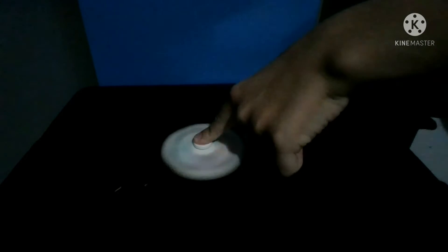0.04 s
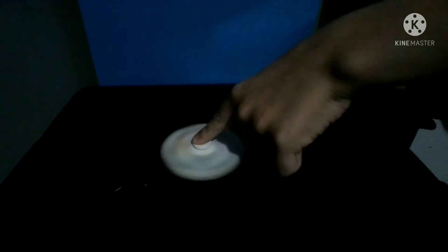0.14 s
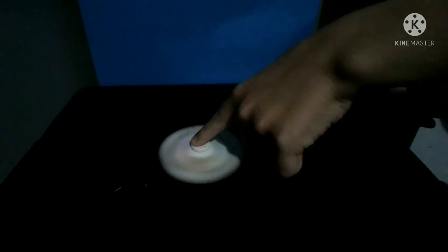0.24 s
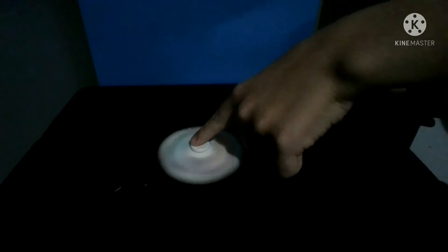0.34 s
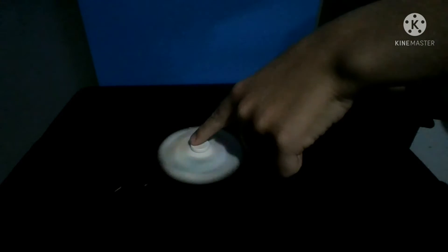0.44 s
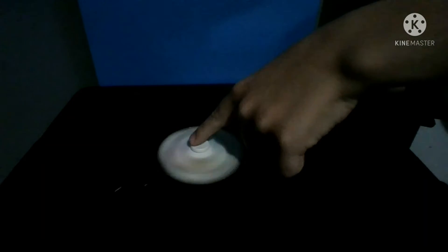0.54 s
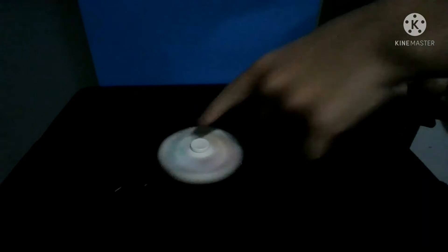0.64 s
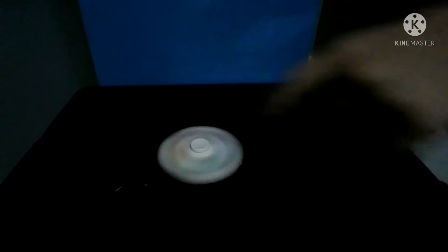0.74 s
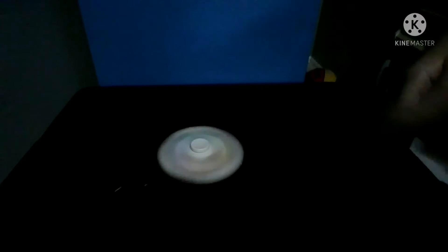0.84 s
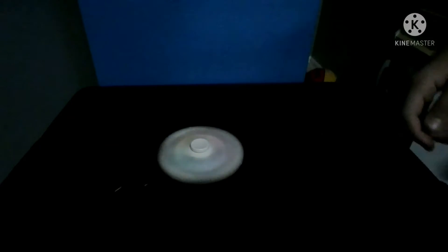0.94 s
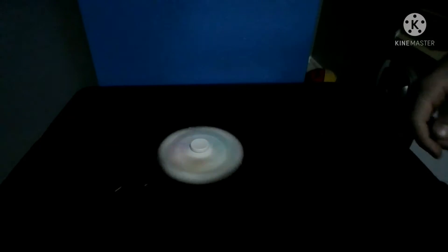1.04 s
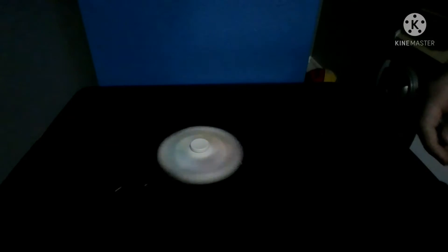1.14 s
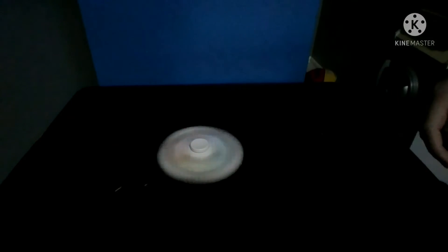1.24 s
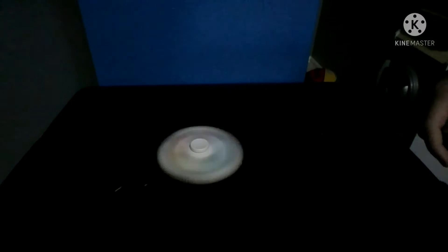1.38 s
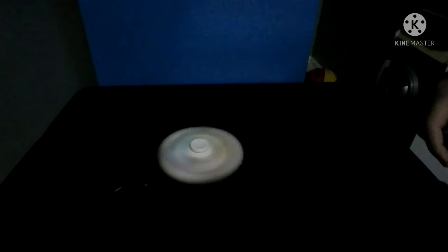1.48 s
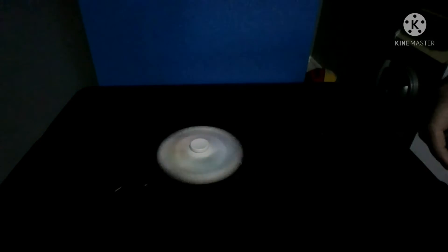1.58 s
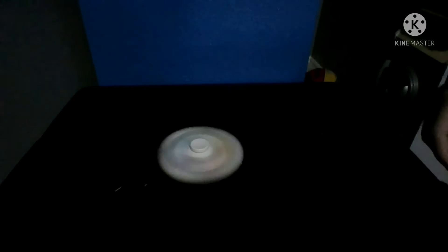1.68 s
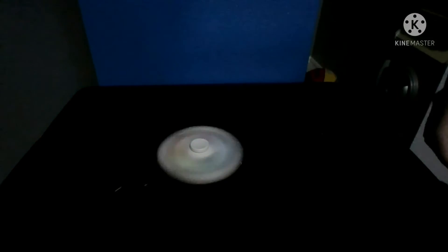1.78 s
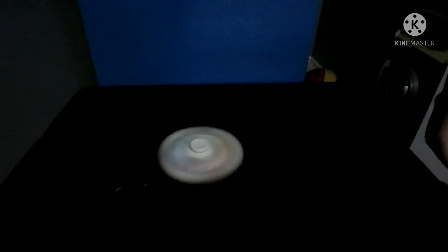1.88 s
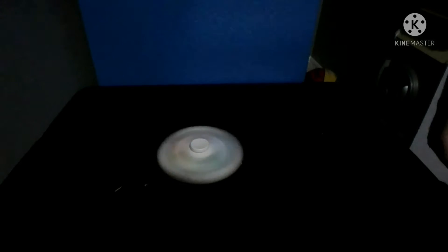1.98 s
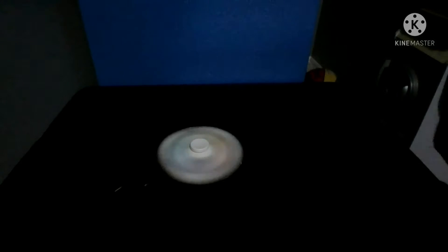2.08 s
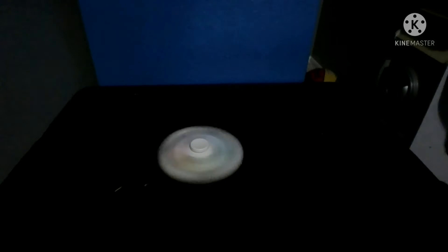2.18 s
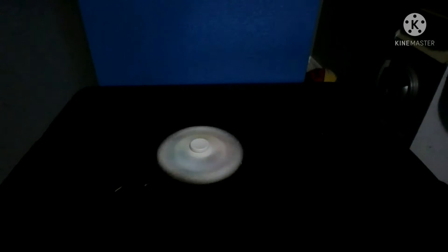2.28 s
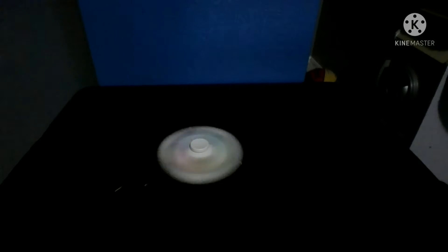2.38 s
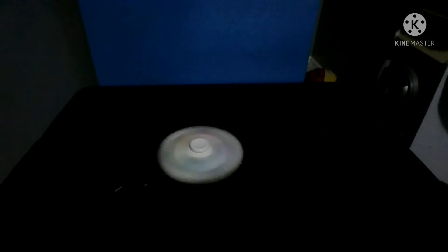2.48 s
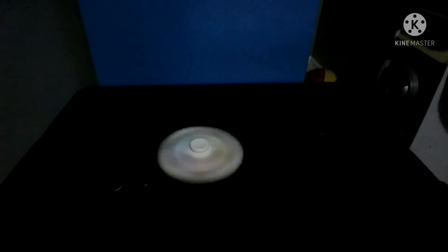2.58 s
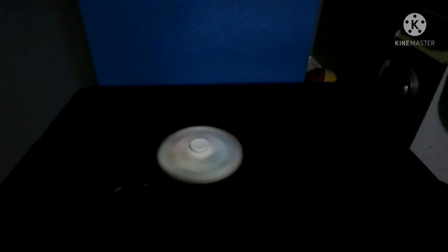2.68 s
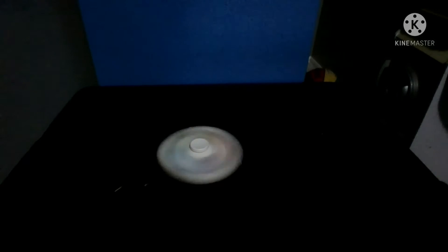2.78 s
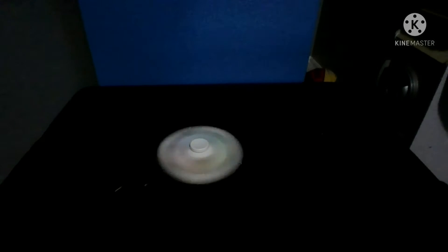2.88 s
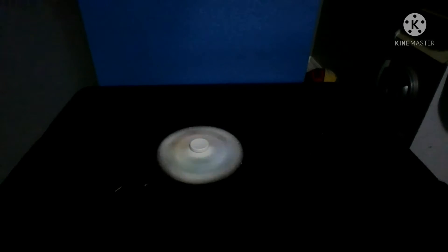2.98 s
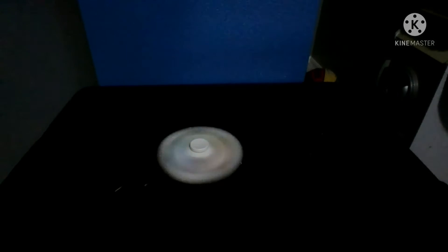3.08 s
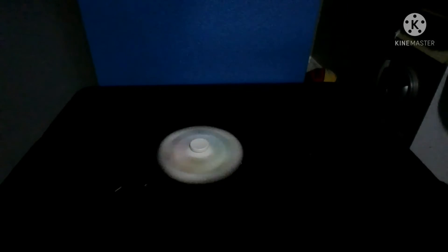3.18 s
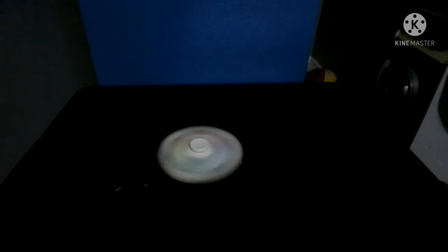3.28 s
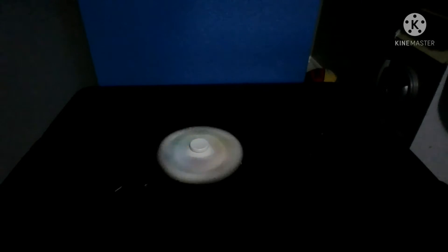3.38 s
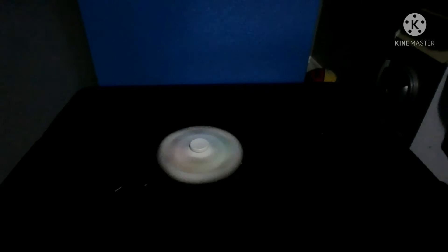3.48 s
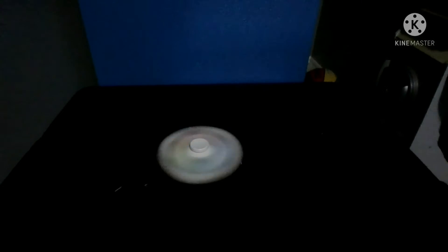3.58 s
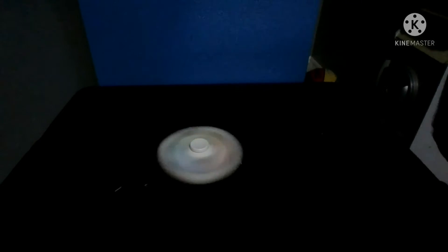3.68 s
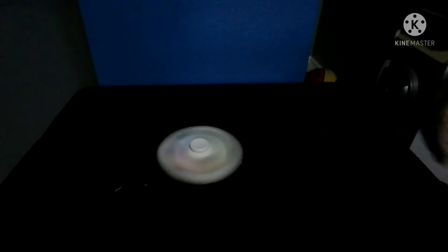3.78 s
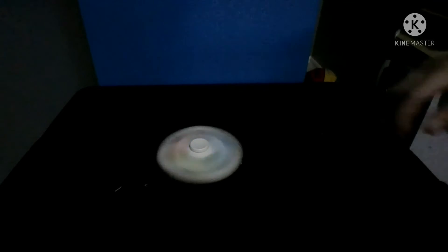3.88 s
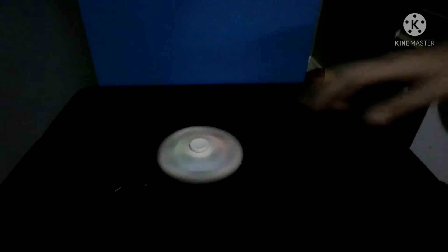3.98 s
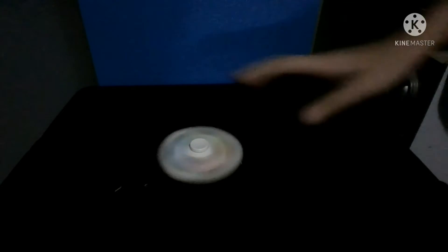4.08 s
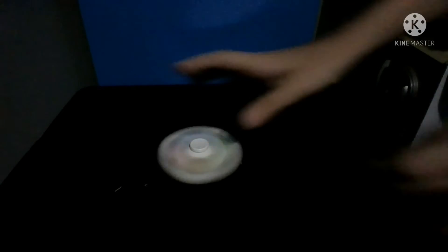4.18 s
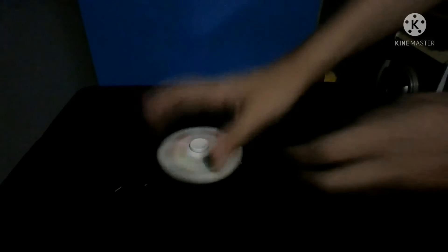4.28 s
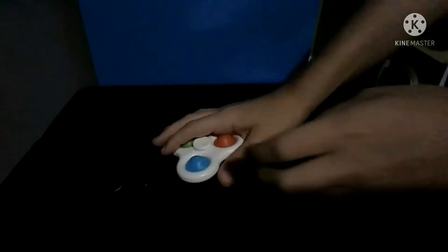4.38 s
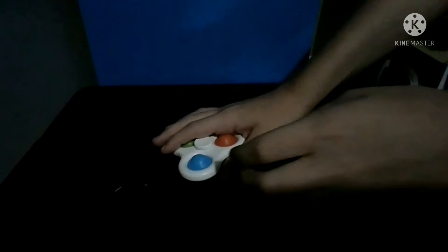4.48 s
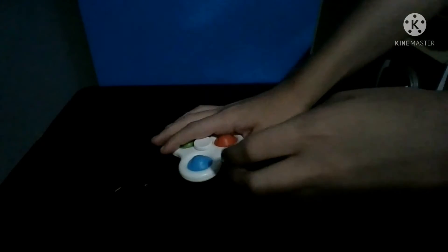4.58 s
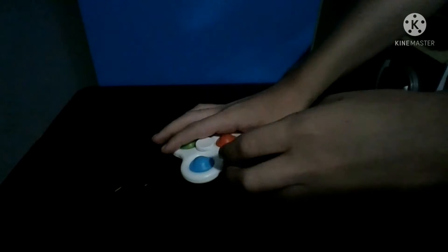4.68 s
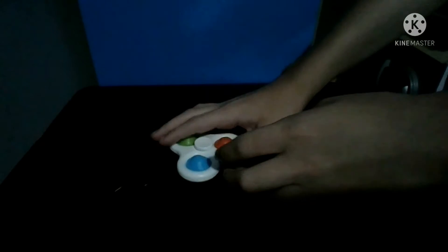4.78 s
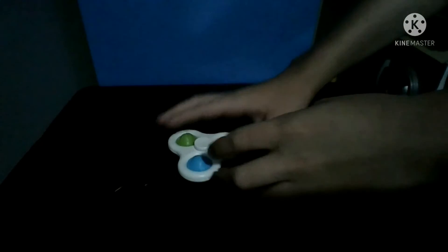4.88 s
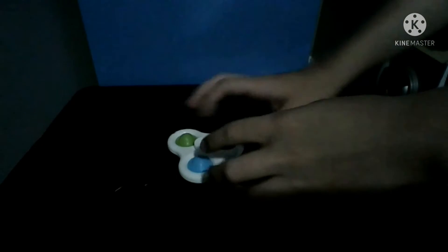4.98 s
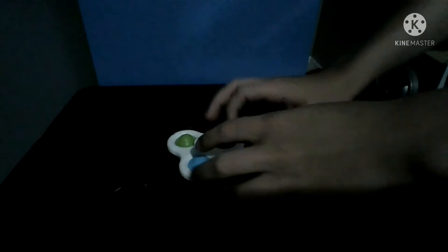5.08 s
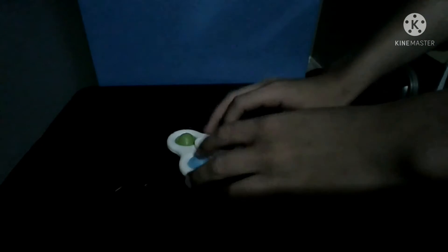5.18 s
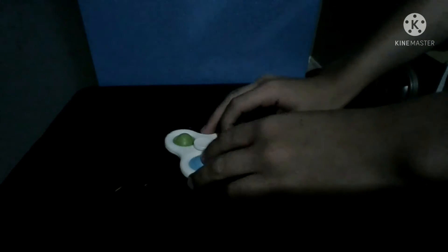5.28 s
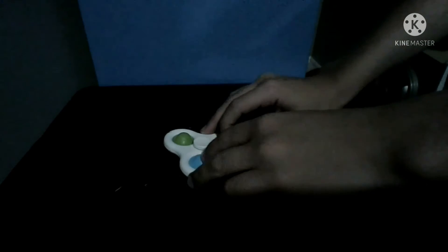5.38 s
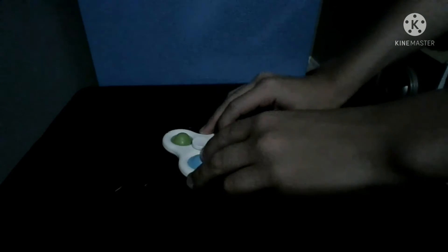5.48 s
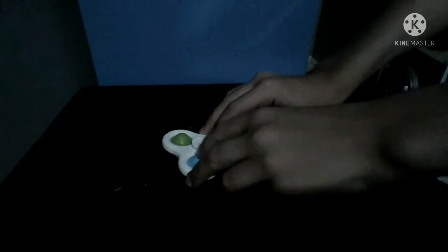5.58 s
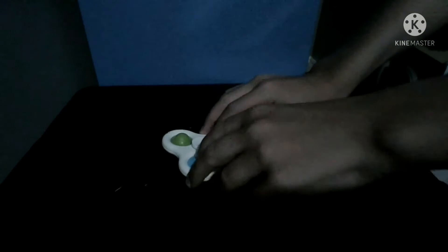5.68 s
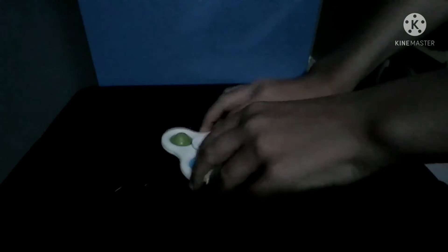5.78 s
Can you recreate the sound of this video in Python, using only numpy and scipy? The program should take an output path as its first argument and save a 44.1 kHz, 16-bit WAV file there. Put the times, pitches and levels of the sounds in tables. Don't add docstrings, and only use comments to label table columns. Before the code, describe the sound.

A plastic spinner is already whirring on a table, close to a phone microphone in a small quiet room. For the first half second a finger presses its hub, so the whir is duller, with a slight hollow ringing; around 0.4 s a brief metallic rasp marks the finger slipping off. From about 0.6 to 4.5 s it spins freely: a steady, dry, bright plastic buzz with steel sizzle, uneven rattling flurries and occasional small wobble knocks, its hiss dulling slightly as it slows. At 4.5 s a hand stops it with a very loud, sharp double clack and a short thud. The whir is gone. Quiet handling follows: a faint tap near 4.8 s, a shuffle and light ticks at 4.9-5.1 s, a tiny pop near 5.26 s, a cluster of clicks around 5.35 s, and a soft set-down at 5.5 s. Palms brush the wood over faint low hum, rumble and hiss.

```python
import sys
import numpy as np
from scipy import signal
from scipy.fft import rfft, irfft
from scipy.io import wavfile
from scipy.ndimage import uniform_filter1d, map_coordinates

SR = 44100
rng = np.random.default_rng(int(sys.argv[2]) if len(sys.argv) > 2 else 0)


def to_wav(s):
    ch = np.atleast_2d(s).T
    pcm = np.round(np.clip(ch, -1, 1) * 32767)
    wavfile.write(sys.argv[1], SR, pcm.astype(np.int16))


def volts_from_decibels(level):
    exponent = np.asarray(level, float) / 20
    return 10 ** exponent


N = 257486
TIME_S = np.arange(N) / SR
STOP_S = 4.49

# pitch_hz, width_hz, level_db, sign of motion
TABLE = [(153.1, 7.2, -2, 1), (231.5, 28.5, -2.5, -1.05), (269, 28.8, -0.5, 0.92), (334.5, 36.5, -5, -0.94),
         (421, 22, -7.5, -0.62), (579, 43, -6.5, -0.85), (650, 65, -13.5, -0.07), (910, 38, -11.5, 0.58),
         (1031, 20, -12.5, 0.74), (1225, 140, -25, -0.75), (1965, 250, -23, 0.3), (2020, 100, -37.5, 0.93)]
# pitch_hz, width_hz, level_db, sign of motion
RACE = [(8000, 200, -5, 1), (8800, 350, -6, -1), (10720, 280, 0, 1), (13100, 250, -6, -1)]
# pitch_hz, width_hz, level_db, sign of motion
RASP = [(4250, 800, 4, 1), (7900, 450, -1, -1), (10700, 1300, 4, 1), (12300, 900, -4, -1)]
# pitch_hz, density_db (per Hz)
SIZZLE = [(2800, -15), (4800, -3.5), (6400, -5), (7600, -3.5), (9600, -3), (11800, -0.5), (14200, -4.5),
          (15600, -0.5)]
# start_s, peak_db
VOLLEYS = [(0.5399, -24.5), (0.5654, -26), (0.6716, -29), (0.6943, -32), (0.715, -32), (0.813, -29),
           (1.0005, -27), (1.0223, -25.5), (1.0703, -29), (1.1183, -34.5), (1.1899, -28), (1.3003, -33.5),
           (1.3433, -26.5), (1.3993, -28.5), (1.5723, -32), (1.6206, -27.5), (1.6921, -31), (1.733, -28),
           (1.8455, -38), (1.8684, -30), (1.937, -29.5), (1.9621, -24.5), (1.9877, -24), (2.0708, -27),
           (2.153, -24.5), (2.1849, -26), (2.2084, -30), (2.282, -27), (2.379, -23), (2.4107, -23),
           (2.5553, -27.5), (2.6062, -28), (2.67, -27.5), (2.7808, -26.5), (2.806, -32.5), (2.8188, -31),
           (2.8547, -29.5), (3.0694, -32.5), (3.0866, -29), (3.1723, -26.5), (3.276, -25.5), (3.307, -23.5),
           (3.3614, -28.5), (3.4208, -31), (3.472, -33), (3.4981, -25), (3.6431, -29.5), (3.6835, -29),
           (3.7719, -30.5), (3.7953, -29), (3.8167, -30), (3.9898, -24.5), (4.0272, -26.5), (4.0502, -32),
           (4.148, -30.5), (4.251, -27), (4.2946, -30.5), (4.314, -27), (4.433, -29), (4.4742, -24)]
VOLLEY_REF_DB = -23


def level(x, db):
    return x * volts_from_decibels(db) / np.sqrt(np.mean(x ** 2))


def ring(x, modes):
    out = 0
    for hz, width, db, sign in modes:
        r = np.exp(-np.pi * width / SR)
        pole = r * np.exp(2j * np.pi * hz / SR)
        out = out + sign * volts_from_decibels(db) * (1 - r) * signal.lfilter([1], [1, -pole], x).imag
    return out


def colour(x, points):
    hz, db = np.transpose(points)
    grid_hz = np.linspace(1, SR / 2, 2049)
    log_gain = np.interp(np.log(grid_hz), np.log(hz), db) * np.log(10) / 20
    cep = irfft(log_gain)
    cep[1:2048] *= 2
    cep[2049:] = 0
    return signal.fftconvolve(x, irfft(np.exp(rfft(cep))))[:N]


def walk(rate):
    k = int(SR / rate)
    steps = np.repeat(rng.standard_normal(N // k + 1), k)
    return 1.3 * uniform_filter1d(uniform_filter1d(steps, k), k)[:N]


def bell(at_s, width_s):
    return np.exp(-((TIME_S - at_s) / width_s) ** 2)


def decay(t, t60_s):
    return np.exp(-np.log(1000) * t / t60_s)


def bursts(times, db, length_s):
    out, t = np.zeros(N + 4096), np.arange(4096) / SR
    chatter = rng.standard_normal((len(times), len(t)))
    chatter[:, 0] = 2.5
    for s, d, tau, c in zip(times, db, length_s, chatter):
        i = int(s * SR)
        out[i:i + len(t)] += volts_from_decibels(d) * c * np.exp(-t / np.clip(tau, 2e-4, .03)) / 2
    return out[:N]


def air():
    # pitch_hz, level_db
    motor_lines = [(28.8, -71), (37.5, -72.5), (46.9, -53), (59.2, -58.5)]
    # pitch_hz, density_db
    rumble_colour = [(20, -6), (35, -5), (105, -9), (200, -9), (400, -20), (700, -40), (1200, -39),
                     (2400, -71.5)]
    # pitch_hz, density_db
    hiss_colour = [(350, -42), (620, -4.5), (891, -17.5), (994, -11), (2160, -14.5), (5770, -19.5),
                   (13100, -17), (15600, -16.5)]
    hum = 0
    for hz, db in motor_lines:
        swell = volts_from_decibels(db - 0.5 + 0.72 * walk(2.4))
        hum = hum + swell * np.sin(2 * np.pi * hz * TIME_S + .2 * walk(3.2))
    rumble = level(colour(rng.standard_normal(N), rumble_colour), -55.5) * volts_from_decibels(1.2 * walk(11))
    hiss = level(colour(rng.standard_normal(N), hiss_colour), -66)
    return hum + rumble + hiss


def room(x):
    t60_s, top_hz, echo_db = 0.19, 3600, -18.5
    t = np.arange(SR // 2) / SR
    tail = rng.standard_normal(len(t)) * decay(t, t60_s) * (t > .004)
    tail = signal.lfilter(*signal.butter(1, top_hz, fs=SR), tail)
    return signal.fftconvolve(x, volts_from_decibels(echo_db) * tail / np.sqrt(np.sum(tail ** 2)))[:N]


def bumps():
    # start_s, peak_db
    rocks = [(0.094, -40.5), (.422, -40.5), (0.462, -38), (0.888, -30), (1.185, -29), (1.217, -33.5),
             (1.421, -40.5), (1.712, -37.5), (2.02, -35.5), (2.046, -41), (2.422, -29), (2.714, -42.5),
             (3.148, -38), (3.291, -42), (3.744, -33), (4.136, -31), (4.206, -37)]
    # start_s, peak_db, pitch_hz, t60_s
    thuds = [(0.26, -29.5, 140, 0.058), (0.282, -38.5, 84, 0.19), (4.487, -21, 140, 0.046),
             (4.49, -31, 329, 0.056), (4.506, -28.5, 198.5, 0.13), (4.506, -30, 86, 0.36),
             (4.509, -26.5, 137.5, .15), (4.52, -32.5, 255, 0.079), (4.546, -38.5, 111, 0.41),
             (4.937, -32, 232, 0.048), (4.983, -44, 160, 0.32), (5.346, -40.5, 199, 0.059),
             (5.491, -43, 175, 0.091)]
    out, t = np.zeros(N + SR // 2), np.arange(SR // 2) / SR
    pushes = list(thuds)
    for s, db in rocks:
        harder_db = db + 42.5
        pushes.append((s, db, 153.2 + 4.5 * harder_db, 0.65 / 2 ** (harder_db / 3.5)))
    for s, db, hz, t60 in pushes:
        swing = np.sin(2 * np.pi * hz * t) * decay(t, t60) * (1 - np.exp(-t / 0.0021))
        out[int(s * SR):int(s * SR) + len(t)] += volts_from_decibels(db + 1.0) * swing
    return out[:N]


def palms():
    # start_s, level_db
    slides = [
        (4.62, -61),
        (4.694, -62.5),
        (4.9, -66),
        (4.928, -44),
        (5.13, -56),
        (5.368, -58),
        (5.5, -70.5),
        (5.839, -56),
    ]
    # pitch_hz, width_hz, level_db, sign of motion
    boards = [(620, 90, 1, 1), (900, 80, 1, -1), (1200, 170, -2, 1), (1478, 110, -3, -1),
              (1780, 180, -8, 1), (1300, 900, -7, -1), (2100, 500, -11, 1)]
    skin = level(ring(rng.standard_normal(N), boards), -23) * volts_from_decibels(2.6 * walk(30))
    low = level(ring(rng.standard_normal(N), TABLE[:5]), -2.4)
    drag = (low + skin) * volts_from_decibels(np.interp(TIME_S, *np.transpose(slides)))
    return drag * (TIME_S > STOP_S)


def snaps():
    # start_s, peak_db
    contacts = [
        (4.5044, -2.5),
        (4.5059, -5.5),
    ]
    out = np.zeros(N)
    s, db = np.transpose(contacts)
    out[(s * SR).astype(int)] = volts_from_decibels(db)
    return signal.lfilter(*signal.butter(1, 1500, "high", fs=SR), out)


def set_down():
    # pitch_hz, level_db, t60_s
    set_modes = [(899, -10, .06), (1045, -14, .04), (1305, -13, .025), (1480, -14, .045), (1760, -16, .04),
                 (2355, -14, .075), (2510, -12, .025), (2750, -12, .02), (2920, -12, .025),
                 (3165, -14, .025), (3420, -12, .02), (3200, -3, .009), (3880, -14, .02), (5125, -24, .02)]
    start_s, peak_db = 5.48975, -26.5
    out, t = np.zeros(N + 8192), np.arange(8192) / SR
    hz, db, t60 = np.transpose(set_modes)[:, :, None]
    note = np.sum(volts_from_decibels(db) * np.sin(2 * np.pi * hz * t) * decay(t, t60), axis=0)
    note = note * (1 - np.exp(-t / 0.00012))
    i = int(start_s * SR)
    out[i:i + len(t)] += volts_from_decibels(peak_db) * note
    return out[:N]


def contacts():
    # start_s, peak_db, length_s
    slaps = [
        (4.4906, -13, 0.003),
        (4.5046, -5, 0.00029),
        (4.5048, -8, 0.0018),
        (4.5059, -0.5, 0.00055),
        (4.5066, -6, 0.0028),
        (4.5152, -11.5, .0006),
        (4.514, -26, 0.014),
    ]
    scuffs = [(4.4945, -26.5, 0.011), (4.5102, -5, 0.0021), (4.673, -48.5, 0.0021), (4.9334, -38, 0.0058),
              (4.941, -38, .006), (5.341, -40.5, .0028), (5.3495, -33.5, 0.0015), (5.3508, -32, .0012),
              (5.3523, -37, .0015), (5.359, -47.5, .003), (5.3668, -37, 0.00116), (5.374, -54, .012),
              (5.389, -56, .004)]
    ticks = [
        (4.944, -32, 0.0025),
        (4.9475, -31, 0.0025),
        (4.9755, -36.5, .002),
        (4.995, -42, 0.0022),
        (5.034, -58, .0027),
        (5.056, -42.5, 0.00224),
        (5.082, -52.5, 0.00293),
        (5.3502, -36.5, .0015),
        (5.4911, -31, 0.00068),
    ]
    pops = [
        (4.997, -38.5, 0.00089),
        (5.21, -65, 0.03),
        (5.264, -46, 0.002),
        (5.346, -36, 0.0012),
        (5.3505, -39, 0.00037),
        (5.359, -40, 0.0011),
        (5.3665, -35, 0.0004),
        (5.378, -52, .001),
    ]
    taps = [
        (4.778, -51, .004),
        (4.838, -40, 0.0024),
        (4.9334, -33.5, 0.0058),
        (5.037, -52, .003),
        (5.102, -51, 0.004),
        (5.4905, -33.5, 0.0065),
    ]
    chirps = [
        (4.4903, -21, .002),
        (4.9335, -41, .003),
        (4.941, -44, 0.0065),
        (4.97, -52.5, 0.0033),
        (5.032, -52, .002),
        (5.098, -51, 0.0018),
        (5.264, -53, 0.0024),
        (5.39, -56, .008),
        (5.4898, -37.5, 0.0019),
        (5.494, -45, .007),
    ]
    # crack, arms, cap, wood, table top, relative dB
    kinds = ((slaps, (1, -8.5, -16, -12, -3.5)),
             (scuffs, (0, -14.5, -29, -18.5, -18)),
             (ticks, (-8, 2, -30, -30, -4)),
             (pops, (-6, -12, 0, -29, -18)),
             (taps, (-19, -14, -28, -8, 5)),
             (chirps, (0, -30, -40, -30, -40)))
    # pitch_hz, width_hz, level_db, sign of motion
    held_arms = [(2890, 220, -8, 1), (3110, 170, -1, -1), (3400, 170, 0, 1), (3800, 300, -14, -1),
                 (2600, 900, -13, -1)]
    # pitch_hz, width_hz, level_db, sign of motion
    held_cap = [(2358, 45, 0, 1)]
    # pitch_hz, width_hz, level_db, sign of motion
    boards = [(620, 90, 1, 1), (900, 80, 1, -1), (1200, 170, -2, 1), (1478, 110, -3, -1),
              (1780, 180, -8, 1), (1300, 900, -7, -1), (2100, 500, -11, 1)]
    # pitch_hz, level_db
    shell = [(2400, -10), (3600, -1.5), (5000, -0.5), (6300, -4.5), (8600, 0.5), (10600, -6.5), (12600, -3),
             (14800, -1.5)]
    rows = [(s, length, *(db + np.array(mix))) for events, mix in kinds for s, db, length in events]
    when, length_s, crack_db, arms_db, cap_db, wood_db, table_db = np.transpose(rows)

    crack = volts_from_decibels(1.5) * colour(-bursts(when, crack_db, length_s), shell)
    is_chirp = np.arange(len(when)) >= len(when) - len(chirps)
    steel_db = np.where(is_chirp, crack_db - 4, crack_db - 10)
    steel = volts_from_decibels(11) * ring(bursts(when, steel_db, length_s), RASP[1:] + RACE)
    parts = ((arms_db, held_arms), (cap_db + 7.5, held_cap), (wood_db, boards), (table_db, TABLE))
    rings = volts_from_decibels(22.0) * sum(ring(bursts(when, db, length_s), modes) for db, modes in parts)
    body = signal.butter(2, [700, 3800], "band", fs=SR)
    knock = volts_from_decibels(10.0) * signal.lfilter(*body, bursts(when, wood_db, 1.6 * length_s))
    return crack + steel + knock + rings


def hands():
    return contacts() + snaps() + set_down() + palms()


def patter(rate, spread_db, rub_db):
    hardness = np.minimum(rng.exponential(size=N), 3.2)
    hits = (rng.random(N) < rate / SR) * volts_from_decibels(spread_db * hardness) * rng.choice([-1, 1], N)
    return level(hits, 0) + volts_from_decibels(rub_db) * rng.standard_normal(N)


def ball_passes(rate, jitter, spread_db):
    timing, strength = rng.standard_normal((3000, 2)).T
    slowing = 1 + 1.2e-4 * np.arange(3000)
    gaps = np.clip(1 + jitter * timing, .2, 3) * slowing / rate
    at = (np.cumsum(gaps) * SR).astype(int)
    out = np.zeros(N)
    out[at[at < N]] = volts_from_decibels(spread_db * strength)[at < N]
    return level(out, 0)


def volley_gain():
    rise_s, fall_s = .0006, .004
    s, db = np.transpose(VOLLEYS)
    marks = np.zeros(N)
    marks[(s * SR).astype(int)] = volts_from_decibels(db - VOLLEY_REF_DB)
    u = TIME_S[:2048]
    flare = (1 - np.exp(-u / rise_s)) * np.exp(-u / fall_s)
    return 1 + 0.57 * signal.fftconvolve(marks, flare)[:N]


def waver(x, depth_s, rate):
    return map_coordinates(x, [np.arange(N) + depth_s * SR * walk(rate)], mode="mirror")


def spin_gain(start_db, db_per_s, pressed_db, extra_db=0):
    # start_s, pressure (0-1)
    finger = [
        (0, 0.9),
        (.17, 0.82),
        (.24, 0.68),
        (.36, 0.47),
        (.5, 0.33),
        (.58, 0.23),
    ]
    press = np.clip(np.interp(TIME_S, *np.transpose(finger)), 0, 1)
    return volts_from_decibels(start_db + db_per_s * TIME_S + pressed_db * press + extra_db)


def plastic_arms(balls, cage):
    # pitch_hz, width_hz, level_db, sign of motion
    arm_modes = [(2360, 56, -17, -1), (2550, 700, -20, -1), (2790, 252, -19, 1), (3070, 81, 0, 1),
                 (3170, 76, 2, -1), (3310, 90, -2, 1), (3500, 93, -4, -1), (3650, 113, -10, -1),
                 (3930, 469, -11, 1), (4140, 237, -25, -1), (4420, 182, -12, -1), (4790, 111, -17, 1)]
    # start_s, level_db
    looseness = [(.5, 2.5), (.6, -0.5), (.9, 2.5), (1.2, 1.5), (1.4, 2), (1.55, 1.5), (1.75, 2), (1.87, -1),
                 (1.97, 3), (2.07, 1.5), (2.4, 2), (2.7, 1), (3, 1.5), (3.3, 0.5), (3.6, 1.5), (3.9, 2),
                 (4.2, 1), (4.45, -0.5)]
    drive = (balls + volts_from_decibels(1.5) * cage) * volley_gain()
    drive = drive * volts_from_decibels(np.interp(TIME_S, *np.transpose(looseness)))
    struck_s, struck_db = np.transpose(VOLLEYS)
    drive = drive + bursts(struck_s, struck_db - VOLLEY_REF_DB + 35, np.full(len(struck_s), .0002))
    arms = waver(ring(drive, arm_modes), depth_s=6e-5, rate=30)
    return level(arms, 0.95) * spin_gain(-35.5, -0.34, -18)


def plastic_hub(balls, cage):
    # pitch_hz, width_hz, level_db, sign of motion
    hub_modes = [(1463.7, 38, 4, 1), (1698, 55, -13.5, -0.82), (1270, 130, -11, -0.061)]
    hub = waver(ring(balls + volts_from_decibels(-3.5) * cage, hub_modes), depth_s=2e-4, rate=20)
    sing_db = 6.5 * bell(0.2, 0.1)
    return level(hub, 0.48) * spin_gain(-51.5, -0.37, -2.9, sing_db + 1.5 * walk(12))


def steel_sizzle(balls, cage):
    rasp_s = 0.43
    steel = (balls + volts_from_decibels(-13) * cage) * rng.choice([-1, 1], N)
    race = level(ring(steel * rng.choice([-1, 1], N), RACE), -9)
    sizzle = level(level(colour(steel, SIZZLE), 0) + race, -1.0)
    sizzle = sizzle * spin_gain(-36.5, -1.34, .5, 0.5 * bell(rasp_s, 0.06) + 0.37 * walk(30))
    swell = bell(rasp_s, np.where(TIME_S < rasp_s, 0.13, 0.039))
    sizzle = sizzle + level(ring(steel * rng.choice([-1, 1], N), RASP), -39.5) * swell
    damped = signal.lfilter(*signal.butter(1, [4000, 7800], "band", fs=SR), sizzle)
    return sizzle - np.interp(TIME_S, [.18, .24], [.6, 0]) * damped


def table_drone():
    # pitch_hz, width_hz, level_db, sign of motion
    pressed_modes = [(160, 26, 2, 0.81), (597, 62, -8.5, -0.82), (885, 250, -6.5, 1), (1010, 31, -13, -1),
                     (1350, 72, -7.5, 0.89), (1290, 2400, -6.5, -0.89), (1760, 400, -7, 0.84),
                     (2120, 60, -13, -0.87), (2400, 52, -0.5, 1)]
    late_mode = [(337, 28, 0, -1)]
    rolling = patter(rate=3200, spread_db=7.5, rub_db=4.0)
    unload_db = -8.5 * bell(0.38, 0.13)
    table = level(ring(rolling, TABLE), 1.0) * spin_gain(-44, -0.31, -5, unload_db)
    late = level(ring(rolling, late_mode), -71.5) * volts_from_decibels(4 * TIME_S)
    pressed = level(ring(rolling, pressed_modes), -41) * volts_from_decibels(-16.5 * TIME_S + 2.1 * walk(53))
    pressed = pressed * np.clip((0.248 - TIME_S) / 0.048, 0, 1)
    return table + late + pressed


def wobble_knocks():
    # start_s, peak_db, clack_db (body, relative)
    hard = [(0.23, -21.5, -14), (0.3996, -20.5, -19), (0.5638, -22, -21), (0.684, -21.5, -21),
            (0.7967, -24.5, -22), (1.1894, -20, -7), (1.4807, -29, -2), (1.6254, -22.5, -11),
            (1.6922, -20, -25), (1.8987, -22, -19), (1.9635, -24.5, -16), (2.0245, -25.5, -9.5),
            (2.186, -28.5, -18), (2.4106, -27.5, -20), (2.7144, -24, -24), (2.7817, -22.5, -30),
            (3.1519, -22.5, -17), (3.2976, -21, -27), (3.6059, -22.5, -33), (3.7431, -26, -7),
            (4.1396, -23.5, -32)]
    turns_per_s, slowing_per_s = 16.5, .035
    timing, strength = rng.standard_normal((80, 2)).T
    even_s = (np.arange(80) + 8 + .15 * timing) / turns_per_s
    s = even_s * (1 + slowing_per_s * even_s / 2)
    faint = np.array([s, -29 + 2.5 * strength, np.full(80, -20.0)])[:, s < STOP_S]
    when, db, clack_db = np.hstack([np.transpose(hard), faint])
    length_s = np.full(len(when), .003)
    knocks = volts_from_decibels(3.5) * colour(bursts(when, db, length_s), SIZZLE)
    body = signal.butter(1, [1200, 4500], "band", fs=SR)
    clacks = volts_from_decibels(9) * signal.lfilter(*body, bursts(when, db + clack_db, length_s))
    return knocks + clacks


def spinner():
    balls = patter(rate=1400, spread_db=2.5, rub_db=-3.0)
    cage = ball_passes(rate=235, jitter=.22, spread_db=2.5) * volts_from_decibels(.8 * walk(40))
    whir = plastic_arms(balls, cage) + plastic_hub(balls, cage) + steel_sizzle(balls, cage) + table_drone()
    stopping = np.clip((STOP_S + 0.012 - TIME_S) / 0.0083, 0, 1)
    return whir * stopping + wobble_knocks()


def scene():
    whir, handling = spinner(), hands()
    echo = room(volts_from_decibels(-7) * whir + handling)
    return (whir + handling + bumps() + echo + air())[None]


def roll_off(x):
    return signal.sosfilt(signal.butter(12, 15520, fs=SR, output="sos"), x)


def record(dry):
    rounded = np.tanh(dry / 1.403) * 1.693
    top_cut = signal.ellip(8, .2, 50, 15750, fs=SR, output="sos")
    return roll_off(signal.sosfilt(top_cut, rounded))


dry = scene()
out = record(dry)
to_wav(out)
```